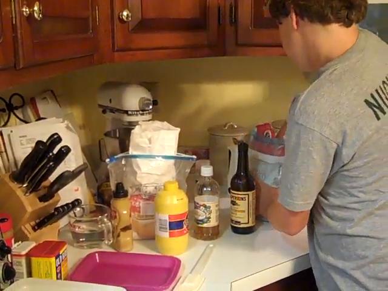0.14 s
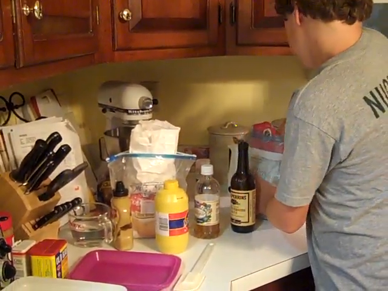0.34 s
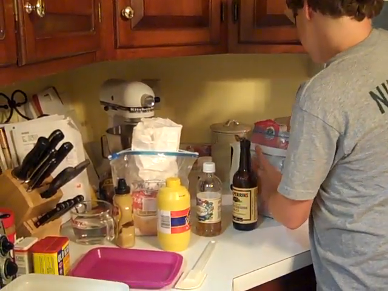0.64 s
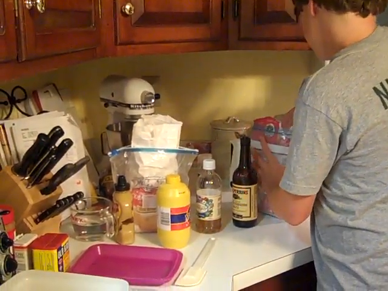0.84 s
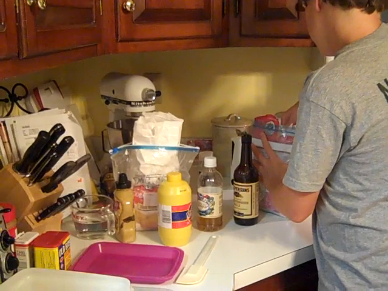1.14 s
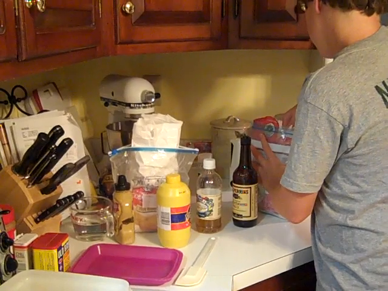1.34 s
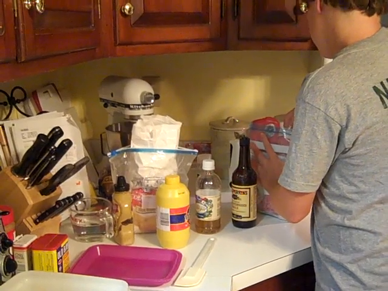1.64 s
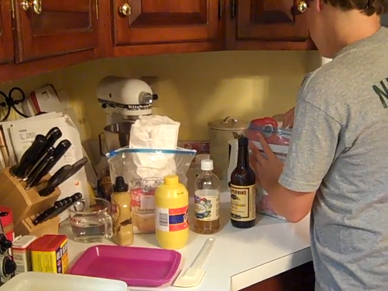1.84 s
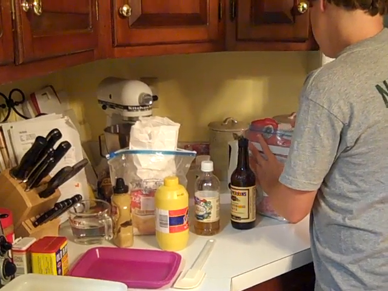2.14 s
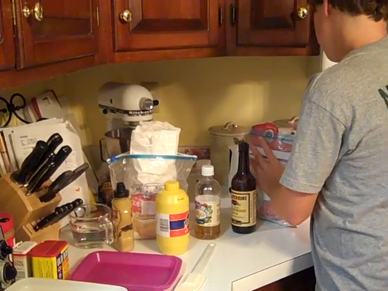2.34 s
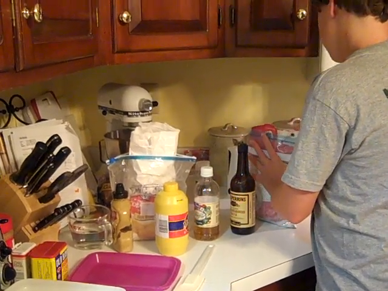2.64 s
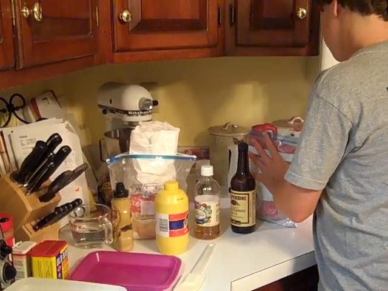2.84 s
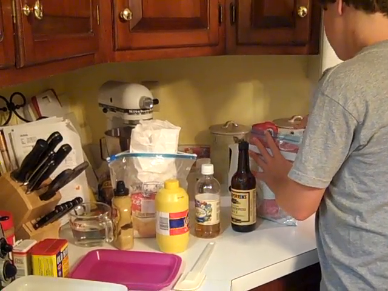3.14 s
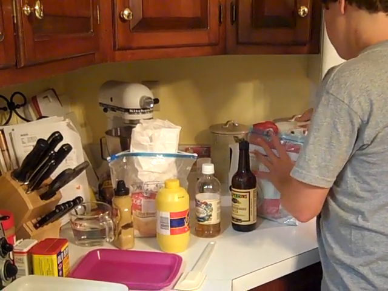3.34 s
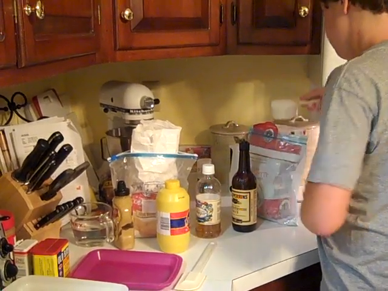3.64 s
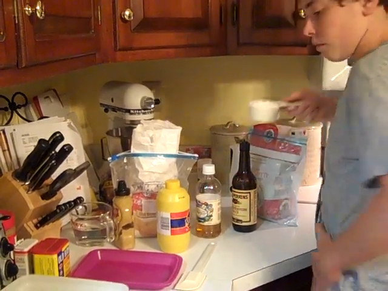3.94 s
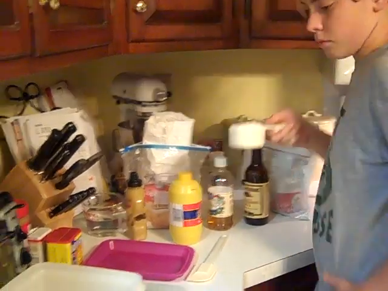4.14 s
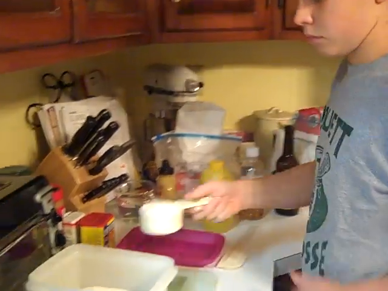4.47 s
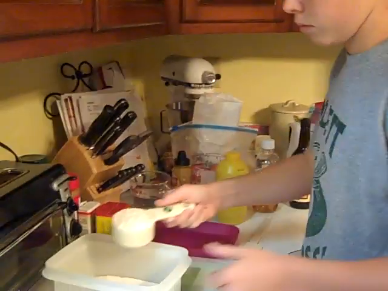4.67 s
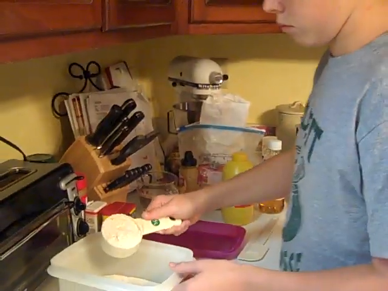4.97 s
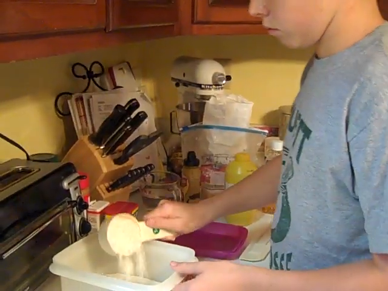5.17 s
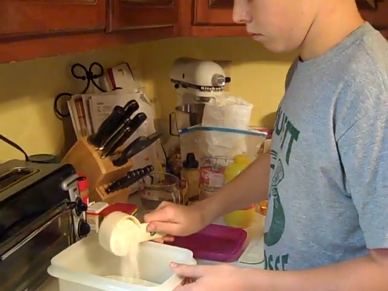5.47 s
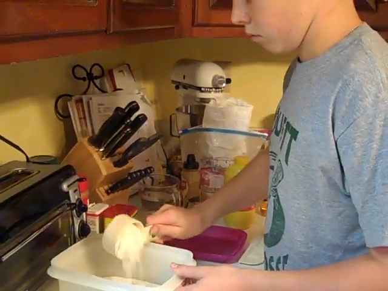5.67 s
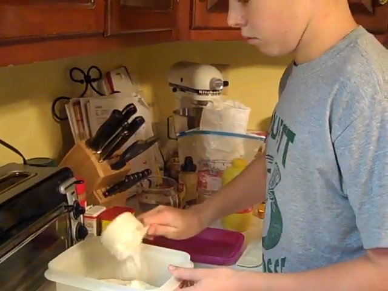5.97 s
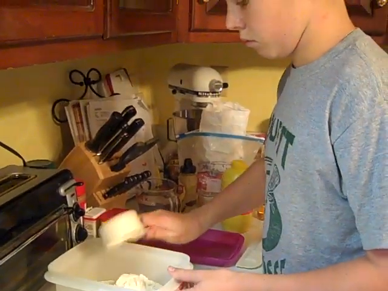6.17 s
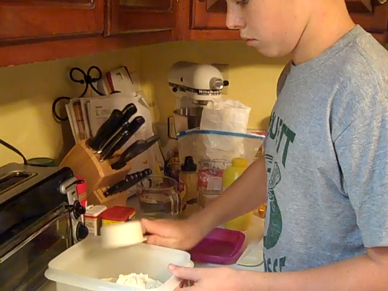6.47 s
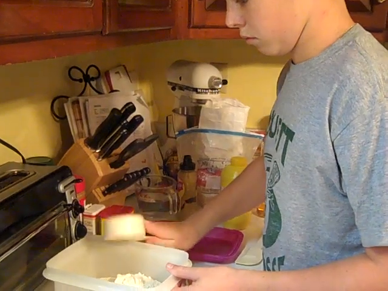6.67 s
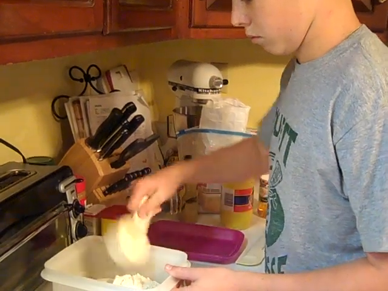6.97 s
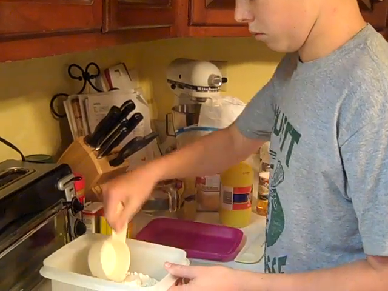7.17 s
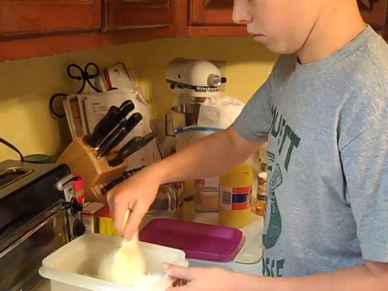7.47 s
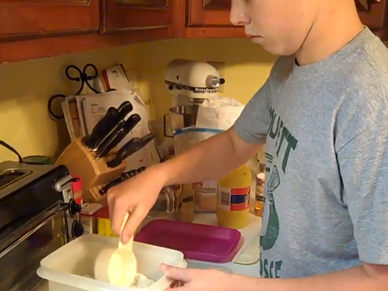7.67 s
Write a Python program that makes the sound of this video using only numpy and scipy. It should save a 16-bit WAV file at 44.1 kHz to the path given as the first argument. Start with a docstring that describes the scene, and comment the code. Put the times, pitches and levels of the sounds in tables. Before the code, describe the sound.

A refrigerator drones low and slightly unsteady throughout in a lived-in kitchen. From 0 to about 1.9 s a thin plastic bag crackles busily, with bright crease snaps and soft, dull pats on its flour-filled body, the sharpest snap at 1.8 s. Sparser rustles and small snaps continue from 2.3 to 3.4 s, then fade by 3.6 s. Soft hand brushing passes at 3.8 s, a low bump nudges the camera near 4.4 s, a tiny click comes at 4.5 s and another swish at 4.8 s. From 5.1 s a plastic cup knocks the hollow tub, with a quick double, then roughly every 0.2 s, brighter and harder, with little rattling bounces. The taps at 6.5 and 6.7 s are loudest, ringing and clipping. A duller knock lands at 7.1 s. Flour hisses faintly, with slight brushing around 7.4 and 7.7 s over the hum.

```python
"""A refrigerator hums and drones in a home kitchen, made from shaped noise and unsteady tones.
From the start a plastic bag rustles, snaps and is patted as flour is scooped: crackle and short noise bursts.
Then a hand brushes past as soft hiss, a low bump lands on the small camera as one slow pulse, and the hand
clicks on the tub. Last a plastic measuring cup taps the tub rim, hard enough to clip, and flour trickles:
knocks, ringing and hiss. The cupboards and walls answer every blow with a fading tail of noise."""
import sys
import numpy as np
from scipy import signal
from scipy.fft import rfft, irfft, next_fast_len
from scipy.io import wavfile
from scipy.ndimage import uniform_filter1d, map_coordinates

SR = 44100
rng = np.random.default_rng(int(sys.argv[2]) if len(sys.argv) > 2 else 0)


def transcribe(u):
    """Save the signal u as a 16-bit wav file named by the first command-line argument.

    u: samples, shape (n,) or (channels, n), limited to [-1, 1]; the rate is SR.
    q: integer samples, one column per channel.
    """
    v = np.clip(np.atleast_2d(u).T, -1, 1)
    q = np.round(v * 32767).astype(np.int16)
    wavfile.write(sys.argv[1], SR, q)


def how_loud(loudness_db):
    """Turn decibels into a plain amplitude multiplier (0 dB gives 1, 20 dB gives 10)."""
    steps = np.asarray(loudness_db, float) / 20
    return 10 ** steps


N = 344421  # length in samples

# Levels in the tables are relative: each sound is trimmed again where it is mixed.
# broad drone of appliances and self-noise: pitch_hz, level_db (per Hz)
DRONE_COLOUR = [(12, -45), (20, -50), (49, -9), (89, -10.5), (115, -10.5), (183, -13.5), (229, -2),
                (367, -6), (587, -12.5), (674, -10.5), (1460, -22), (2280, -31), (6910, -31), (13100, -46),
                (15000, -54)]
# hum tones, slightly unsteady in level and phase: pitch_hz, level_db
HUM_TONES = [(118.4, -58), (242.2, -71.5), (290.7, -59.5), (371.4, -61), (742.9, -63), (2837, -73.5),
             (6584, -69)]
# how hard the hands work the bag: time_s, level_db
RUSTLE_CURVE = [(0.0, -40.5), (0.1, -43.5), (0.3, -37), (0.43, -38), (0.64, -46.5), (0.72, -48),
                (0.83, -37.5), (1.0, -46.5), (1.1, -39.5), (1.3, -37.5), (1.59, -43.5), (1.78, -36.5),
                (1.86, -34), (1.92, -36), (1.95, -39.5), (2.33, -43.5), (2.4, -39), (2.47, -52),
                (2.55, -42), (3.3, -51.5), (3.36, -40), (3.47, -50), (3.6, -68)]
# creases snapping, some at once, some rolling over, and at 4.511 the click of the hand reaching the tub:
# start_s, level_db, pitch_hz, rise_ms
SNAPS_AND_CLICK = [(0.024, -19, 3000, .6), (0.1326, -21.5, 8050, 1.4), (0.1525, -23, 4530, 1),
                   (0.2821, -14.5, 7980, 0.52), (0.3513, -16, 6140, 2.7), (0.4022, -20.5, 3000, 1.5),
                   (0.4813, -21, 8200, 0.53), (0.644, -32, 1780, 1), (0.6674, -22, 2100, 2.3),
                   (0.6774, -20, 2070, 1), (0.7442, -24, 2300, 3), (0.8288, -19, 2730, 2.2),
                   (0.8507, -33, 2470, 1.2), (1.021, -17, 2370, 2), (1.0426, -21, 6840, 1.5),
                   (1.0859, -38, 3020, 1.5), (1.1404, -20, 2480, 1.9), (1.182, -16, 7740, 2.4),
                   (1.224, -23, 2600, 2.1), (1.3026, -17, 7400, 2.4), (1.3595, -22, 7900, 1.8),
                   (1.4687, -24, 2320, 5.6), (1.605, -22.5, 2300, 1.9), (1.627, -17, 6560, 1.1),
                   (1.6961, -18, 2350, 2.2), (1.7513, -13.5, 2700, 2.9), (1.808, -6, 1730, 0.44),
                   (2.3742, -25, 6220, 6), (2.5183, -17, 5260, 1.3), (2.6045, -20, 2090, 1),
                   (2.6857, -16, 5740, 5.4), (2.7894, -30, 2150, 1.3), (2.888, -20.5, 2330, 3.8),
                   (3.0843, -32, 2130, 2), (3.1867, -29.5, 2350, 3), (3.3698, -31, 2840, 1.8),
                   (4.511, -31.5, 6840, 0.4)]
# pats on the full bag: start_s, level_db, pitch_hz
BAG_PATS = [(0.4026, -37, 567), (0.6443, -35.5, 592), (0.6674, -25.5, 560), (0.6775, -24.5, 720),
            (0.742, -35.5, 832), (0.8287, -22.5, 700), (0.8494, -33, 760), (1.021, -21, 675),
            (1.0444, -30, 266), (1.225, -26, 630), (1.4685, -35, 517), (1.6277, -33, 464),
            (1.7524, -32, 830), (1.8089, -22.5, 427), (1.8105, -20, 820), (2.5184, -43, 800),
            (2.6045, -38.5, 810), (2.683, -38, 810), (2.7893, -36, 770), (3.371, -43, 830)]
# thin plastic crackle: pitch_hz, level_db (per Hz)
FILM_COLOUR = [(710, -23), (1200, -2.5), (1380, -7.5), (1760, -5), (2820, -3.5), (4220, -2), (8130, 0.5),
               (10800, -19), (13600, -20), (15000, -36)]
# full bag shifting: pitch_hz, level_db (per Hz)
CRUMPLE_COLOUR = [(120, -44.5), (200, 6), (258, -1), (352, -7), (672, -3), (1020, -8.5), (2420, -3),
                  (5000, -17), (6500, -40), (11000, -120)]
# sleeve and hand brushing over cloth and tub: peak_s, level_db, swell_db_per_s, fade_db_per_s
BRUSH_STROKES = [(3.79, -49, 202, 156), (4.02, -55, 40, 26), (4.516, -54, 1500, 220), (4.8, -43, 71, 148),
                 (5.022, -53.5, 260, 270), (7.39, -55.5, 202, 154), (7.66, -60, 396, 196)]
# sound of the brushing: pitch_hz, level_db (per Hz)
SWISH_COLOUR = [(760, -43), (1300, -16), (1600, -8), (1850, -3), (2150, -7.5), (2890, -7), (5790, -7.5),
                (6750, 0), (13700, -29.5), (14500, -31), (15000, -69)]
# a soft low bump on the camera: peak_s, level_db, pitch_hz (sets how narrow the push is)
CAMERA_BUMP = (4.375, -38, 49)
# cup on rim; the emptier cup rings more: start_s, crack_db, knock_db, knock_hz, ring_db
CUP_TAPS = [(5.1309, -20, -5.5, 755, -45), (5.1557, -16.5, -9, 796, -33), (5.3463, -17.5, -7, 763, -33),
            (5.4972, -35, -18, 780, -66), (5.7253, -13.5, -6, 780, -65), (5.906, -12, -5.5, 780, -47),
            (6.0933, -7.5, -4, 787, -40), (6.289, -6.5, -4, 727, -25), (6.5046, 0.5, -2.5, 732, -16.5),
            (6.726, 1.5, -1, 755, -14.5), (7.1083, -25, -6.5, 805, -22)]
# the cup rattles back on the rim: start_s, level_db
CUP_BOUNCES = [(5.1904, -23), (5.3906, -20), (5.5114, -48), (5.768, -14), (5.9476, -21), (5.9521, -15.5),
               (6.126, -32), (6.323, -20), (6.543, -15), (6.7604, -37.5)]
# tub walls ringing: pitch_hz, level_db, t60_s (time to fall 60 dB)
TUB_MODES = [(190, -25, 0.13), (261, -28.5, 0.058), (346, -20.5, 0.062), (552, -32, 0.045),
             (637.5, -17, 0.14), (878, -25, 0.052), (1071.5, -19.5, 0.14), (1278, -47, 0.062),
             (1475, -12.5, 0.034), (1680, -13, 0.026)]
# cup ringing: pitch_hz, level_db, t60_s
CUP_MODES = [(1555, -3.5, 0.14), (1897, 0.5, 0.2), (1870, 3.5, 0.12), (2780, -1, 0.035), (3430, -17, 0.056),
             (4150, -13, 0.02), (6500, -4, 0.065)]
# hard contact: pitch_hz, level_db (per Hz)
CRACK_COLOUR = [(710, -18), (1200, 3.5), (1500, -8), (3140, -3), (3970, -0.5), (5180, -4), (7140, -1.5),
                (10600, -24), (13000, -60), (15400, -68)]
# the loose tub shaking on the counter: pitch_hz, level_db (per Hz)
HOLLOW_COLOUR = [(59, -28), (100, -5), (625, 3), (713, -9), (799, 4.5), (1310, -3.5), (1930, -13),
                 (2280, -9.5), (5000, -33), (6500, -47), (11000, -120)]
# flour trickling and settling: time_s, level_db
FLOUR_CURVE = [(5.2, -78), (5.5, -69), (6.9, -62), (7.81, -65)]
# how long the room rings: pitch_hz, t60_s
KITCHEN_FADE = [(60, 0.23), (250, 0.93), (700, 0.41), (2000, 0.57), (5000, 0.29), (12000, 0.38)]
# likeness of left and right: pitch_hz, likeness (1 = the same)
PORT_LIKENESS = [(60, 0.18), (180, 0.9), (550, 0.94), (1640, 0.47), (4960, 0.022), (15000, 0.012)]
# left over right: pitch_hz, level_db
PORT_LEAN = [(60, -2.0), (180, -0.5), (550, -1), (1640, 0), (4960, -3.5), (15000, 17)]

DRONE_DB = -50
CRUMPLE_DB = -6.5  # the duller crumple under the rustle
STIR_DB, STIR_FADE_S = -16, 0.16  # a snap or click stirs up crackle: level under it, t60
HEAVE_DB, HEAVE_FADE_S = -15, 0.41  # a pat shifts the whole bag: level under the pat, t60
SNAP_S, LONGER = 0.033, 8.7  # t60 of a sudden snap; added t60 per second of rise
PAT_S = 0.099  # t60 of one pat
FIRM_DB = -7.5  # a blow whose crack lies further than this under its knock is cushioned
WALLS_DB, WALLS_LOSS = -1.8, 0.37  # tub ring over the knock; dB lost per dB of cushioning
THUMP_DB, THUMP_LOSS = -18.5, 1.7  # counter thump over knock_db; dB lost per dB of cushioning
ECHO_DB, ECHO_LOSS = -11.5, 0.8  # the wall under the cupboards; dB lost per dB of cushioning
# each tap loosens a slide: level, dB per dB of crack, seconds to its peak
SLIDE_DB, SLIDE_GROWS, SLIDE_S = -45.5, 0.78, 0.061
TOP_HZ = 14200  # the treble ends here


def unit(x):
    """Scales to an rms of 1."""
    return x / np.sqrt(np.mean(x ** 2) + 1e-20)


def along(points, hz):
    """Reads a curve of (pitch_hz, value) points on a log pitch axis."""
    f, v = np.transpose(points)
    return np.interp(np.log(hz + 1), np.log(f + 1), v)


def wobble(rate):
    """A smooth random curve with rate knots a second."""
    knots = rng.standard_normal(int(N * rate / SR) + 4)
    coarse_s = np.arange(0, N / SR + .01, .002)
    return np.interp(np.arange(N) / SR, coarse_s, map_coordinates(knots, [coarse_s * rate]))


def filtered(x, response):
    """Multiplies the spectrum of x by a response that depends on pitch."""
    m = next_fast_len(x.shape[-1] + 2048, True)
    spectrum = rfft(x, m) * response(np.fft.rfftfreq(m, 1 / SR))
    return irfft(spectrum, m)[..., :x.shape[-1]]


def burst(t, t60, response):
    """Coloured noise that starts at once and dies away."""
    noise = unit(filtered(rng.standard_normal(len(t)), response))
    return noise * how_loud(-60 * t / t60)


def band(centre_hz, sharpness):
    """A single resonance, as a response."""
    return lambda hz: 1j * hz / (centre_hz ** 2 - hz ** 2 + 1j * hz * centre_hz / sharpness) * centre_hz


def ringing(modes, t, scatter_db, drift):
    """Fading tones of slightly new strength; a wandering phase dulls them like soft plastic."""
    out = np.zeros(len(t))
    for hz, db, t60 in modes:
        fade = how_loud(db + rng.normal(0, scatter_db) - 60 * t / t60)
        wander = drift * np.cumsum(rng.standard_normal(len(t))) / np.sqrt(SR)
        out += fade * np.sin(2 * np.pi * hz * t + wander)
    return out


def add(track, s, sound):
    """Lays a sound into the track at time s."""
    part = track[..., max(round(s * SR), 0):][..., :sound.shape[-1]]
    part += sound[..., :part.shape[-1]]


def curve_gain(curve):
    """Gain along (time_s, level_db) points, near silent (-120 dB) outside them."""
    s, db = np.transpose(curve)
    return how_loud(np.interp(np.arange(N) / SR, s, db, left=-120, right=-120))


def peak_gain(s, db, swell_db_per_s, fade_db_per_s):
    """Gain that swells to a peak at s and fades again."""
    late = np.arange(N) / SR - s
    return how_loud(db - np.maximum(-swell_db_per_s * late, fade_db_per_s * late))


def crackle(colour, per_second, spread_db, hiss, patchy_db):
    """Countless tiny clicks over a soft hiss; its colour varies in random patches of pitch and time."""
    happens = rng.random(N) < per_second / SR
    clicks = happens * rng.standard_normal(N) * how_loud(spread_db * rng.exponential(size=N))
    hz, _, z = signal.stft(unit(clicks) + hiss * rng.standard_normal(N), SR, nperseg=256)
    # random patches, smoothed over pitch and then over time
    patches = uniform_filter1d(rng.standard_normal(z.shape), size=7, axis=0)
    patches = unit(uniform_filter1d(patches, size=8, axis=1))
    z = z * how_loud(along(colour, hz)[:, None] + patchy_db * patches)
    return unit(signal.istft(z, nperseg=256)[1][:N])


def soft_hiss(gain, colour, flutter_db):
    """A fine dry hiss of dense crackle that flutters a little."""
    grains = crackle(colour, per_second=4100, spread_db=3.0, hiss=1.5, patchy_db=-0.4)
    return gain * how_loud(flutter_db * wobble(17)) * grains


def kitchen(x, wet_db):
    """Shared and opposed parts of the direct sound and of a noise tail that dies band by band."""
    hz, t, z = signal.stft(rng.standard_normal((2, SR // 2)), SR, nperseg=256)
    fade = how_loud(-60 * t / along(KITCHEN_FADE, hz)[:, None])
    tail = signal.istft(z * fade, SR, nperseg=256)[1]
    tail = np.pad(tail / np.linalg.norm(tail[0]), ((0, 0), (260, 0)))  # starts 260 samples late
    tail = how_loud(wet_db) * tail
    tail[:, 0] = 1, -.45  # sound from straight ahead is mostly shared
    return signal.fftconvolve(x[None], tail, axes=1)[:, :len(x)]


def refrigerator():
    """A broad noise drone with hum tones whose level and phase are slightly unsteady."""
    noise = filtered(rng.standard_normal((2, N)), lambda hz: how_loud(along(DRONE_COLOUR, hz)))
    now = np.arange(N) / SR
    hum = np.zeros(N)
    for hz, db in HUM_TONES:
        level = np.sqrt(2) * how_loud(db - 2.0 + 2.6 * wobble(9.6))
        hum += level * np.sin(2 * np.pi * hz * now + (0.41 + hz / 900) * wobble(12))
    drone = how_loud(DRONE_DB + 1.5 * wobble(4.15)) * unit(noise)
    return drone + hum * [[1], [.3]]  # the hum is mostly shared


def snap_swell(t, rise_ms):
    """A snap or click grows over its rise time."""
    return (1 - np.exp(-t * 1000 / max(rise_ms, .1))) ** 2


def rustle():
    """Bright crackle follows the hands and flares at snaps and click; dull crumple also heaves at pats."""
    t = np.arange(SR // 2) / SR
    stir_power, heave_power = curve_gain(RUSTLE_CURVE) ** 2, np.zeros(N)
    for s, db, _, rise_ms in SNAPS_AND_CLICK:
        flare = how_loud(db + STIR_DB - 60 * t / STIR_FADE_S) * snap_swell(t, rise_ms)
        add(stir_power, s, flare ** 2)
    for s, db, _ in BAG_PATS:
        add(heave_power, s, how_loud(db + HEAVE_DB - 60 * t / HEAVE_FADE_S) ** 2)
    bright = crackle(FILM_COLOUR, per_second=2000, spread_db=-0.5, hiss=1.0, patchy_db=2.0)
    bright = bright * how_loud(2.5 * wobble(45))
    dull = crackle(CRUMPLE_COLOUR, per_second=2100, spread_db=1.75, hiss=0.82, patchy_db=3.0)
    dull = dull * how_loud(0.87 * wobble(24.97))
    dull_power = how_loud(CRUMPLE_DB) ** 2 * stir_power + heave_power
    return np.sqrt(stir_power) * bright + np.sqrt(dull_power) * dull


def snaps_and_click():
    """Creases snap, and the hand clicks on the tub: a tick, softer in a slow rise, then a pitched burst."""
    out, t = np.zeros(N), np.arange(SR // 6) / SR
    film = lambda hz: how_loud(along(FILM_COLOUR, hz))
    for s, db, snap_hz, rise_ms in SNAPS_AND_CLICK:
        length = SNAP_S + LONGER * rise_ms / 1000
        tick = 0.89 / (1 + 0.35 * rise_ms) * burst(t, 0.57 * length, film)
        pitched = 0.47 * burst(t, length, lambda hz: film(hz) * band(snap_hz, 6.5)(hz))
        add(out, s, how_loud(db) * (tick + pitched) * snap_swell(t, rise_ms))
    return out


def pats():
    """Pats thud into the flour: noise through two low resonances with a softened treble."""
    out, t = np.zeros(N), np.arange(SR // 6) / SR
    for s, db, thud_hz in BAG_PATS:
        body = lambda hz: band(thud_hz, 4.5)(hz) + 1.13 * band(200, 1.8)(hz)
        thud = burst(t, PAT_S, lambda hz: body(hz) / (1 + 1j * hz / 1500))
        add(out, s, how_loud(db) * thud * (1 - np.exp(-t / 0.0027)))  # a palm lands softly
    return out


def bag_and_click():
    """Rustle, snaps and pats of the bag, and the click of the hand on the tub, share one room tail."""
    return kitchen(rustle() + snaps_and_click() + pats(), wet_db=-8)


def brush():
    """A sleeve and hand brush past: dry hiss that swells and fades with each stroke."""
    strokes = sum(peak_gain(*stroke) for stroke in BRUSH_STROKES)
    return kitchen(soft_hiss(strokes, SWISH_COLOUR, flutter_db=3.0), wet_db=-5.0)


def bump():
    """One slow push of pressure on the camera."""
    s, db, hz = CAMERA_BUMP
    return -how_loud(db) * np.exp(-((np.arange(N) / SR - s) * hz * np.pi) ** 2)


def crack_response(hz):
    """The colour of hard plastic contact."""
    return how_loud(along(CRACK_COLOUR, hz))


def tub_knock(t, crack_over_knock_db, knock_hz, cushion_db):
    """The blow pumps the air in the tub for a few cycles, then echoes off the wall."""
    u = t / (.00096 - .000022 * crack_over_knock_db)  # a harder, brighter blow is a shorter one
    # the pitch climbs towards 1.104 times knock_hz as the contact stiffens
    turns = knock_hz * (1.104 * t - 0.00075 * (1 - np.exp(-t / 0.0019)))
    swell = 1.62 * u ** 2 * np.exp(-u - (u / 4.0) ** 6)  # grows, then the rim damps it
    knock = swell * np.sin(2 * np.pi * turns)
    echo = np.roll(knock, round(0.00745 * SR))  # off the wall under the cupboards
    return knock + how_loud(ECHO_DB - ECHO_LOSS * cushion_db) * echo


def tub_walls(t, cushion_db):
    """The tub walls ring while the loose tub shakes on the counter."""
    tub_db = WALLS_DB - WALLS_LOSS * cushion_db
    modes = ringing(TUB_MODES, t, scatter_db=1.5, drift=9.3) * (1 - np.exp(-t / 0.0018))
    shake = burst(t, 0.23, lambda hz: how_loud(along(HOLLOW_COLOUR, hz))) * (1 - np.exp(-t / 0.00062))
    return how_loud(tub_db) * modes + how_loud(tub_db - 19.0) * shake


def rim_crack(t):
    """Hard contact: a bright tick, a short crack and a faint, longer bright noise tail."""
    tick = 1.68 * burst(t, 0.0046, lambda hz: crack_response(hz) * hz / 6000)
    crack = 0.58 * burst(t, 0.021, crack_response)
    noise_tail = how_loud(-27.5) * burst(t, 0.32, crack_response)
    return (tick + crack + noise_tail) * (1 - np.exp(-t / 0.00032))


def cup():
    """Each tap knocks, thumps, cracks and rings, with its own room tail; bounces add a rattle."""
    out, rattle = np.zeros((2, N)), np.zeros(N)
    t = np.arange(SR * 2 // 5) / SR
    for s, crack_db, knock_db, knock_hz, ring_db in CUP_TAPS:
        cushion_db = max(FIRM_DB - (crack_db - knock_db), 0)
        knock = tub_knock(t, crack_db - knock_db, knock_hz, cushion_db)
        tub = how_loud(knock_db + 5.5) * (knock - tub_walls(t, cushion_db))
        thump = burst(t, 0.24, lambda hz: band(70, 1.1)(hz) ** 2) * (1 - np.exp(-t / 0.013))
        thump = how_loud(knock_db + THUMP_DB - THUMP_LOSS * cushion_db) * thump
        crack = how_loud(crack_db + .5) * rim_crack(t)
        ring = ringing(CUP_MODES, t, scatter_db=1.0, drift=11.6) * (1 - np.exp(-t / 0.0012))
        ring = how_loud(ring_db - 4.0) * ring
        add(out, s, kitchen(tub + thump + crack + ring, wet_db=-11.0))
    for s, db in CUP_BOUNCES:
        add(rattle, s, how_loud(db - 4.0) * burst(t, 0.022, crack_response))
    return out + kitchen(rattle, wet_db=-8)


def flour():
    """Flour trickles as a fine hiss, and every tap shakes more of it out."""
    t, slides = np.arange(SR // 2) / SR, curve_gain(FLOUR_CURVE)
    for s, crack_db, *_ in CUP_TAPS:
        slide = (t / SLIDE_S * np.exp(1 - t / SLIDE_S)) ** 3
        add(slides, s, how_loud(SLIDE_DB + SLIDE_GROWS * crack_db) * slide)
    return kitchen(soft_hiss(slides, FILM_COLOUR, flutter_db=5.0), wet_db=-5.0)


def ports(shared, opposed):
    """Two microphone ports hear a shared and an opposed part, mixed by their likeness at each pitch."""
    turn = lambda hz: np.arccos(np.clip(along(PORT_LIKENESS, hz), -1, 1)) / 2
    weights = lambda hz: np.array([np.cos(turn(hz)), 1j * np.sin(turn(hz))])
    mid, side = filtered(np.array([shared, opposed]), weights)
    return np.array([mid + side, mid - side])


def scene():
    """Refrigerator, bag, click, brush, cup and flour reach the two ports; the bump pushes both alike."""
    return ports(*(refrigerator() + bag_and_click() + brush() + cup() + flour())) + bump()


def top_cut(x):
    """Nothing passes above the cut-off."""
    return signal.sosfilt(signal.butter(12, 15550, fs=SR, output="sos"), x)


def record(dry):
    """The ports differ most in the treble and end at a band limit; the hardest taps hit full scale."""
    lean = lambda hz: how_loud(np.outer([.5, -.5], along(PORT_LEAN, hz)))
    heard = filtered(dry, lambda hz: lean(hz) / (1 + (hz / TOP_HZ) ** 40))
    return top_cut(np.clip(heard, -1, 1))


dry = scene()
out = record(dry)
transcribe(out)
```